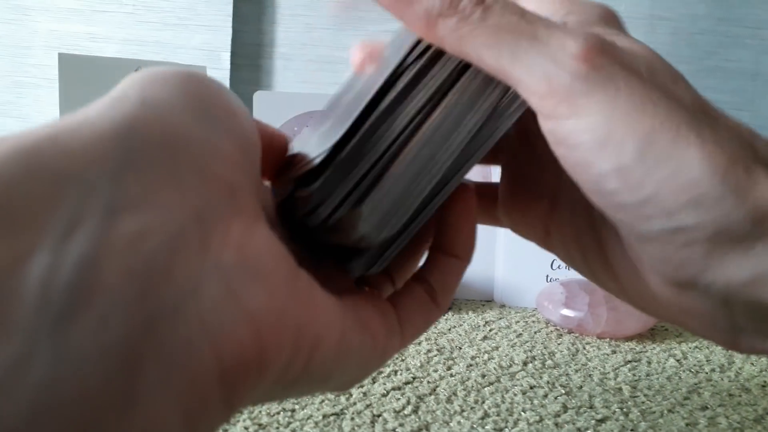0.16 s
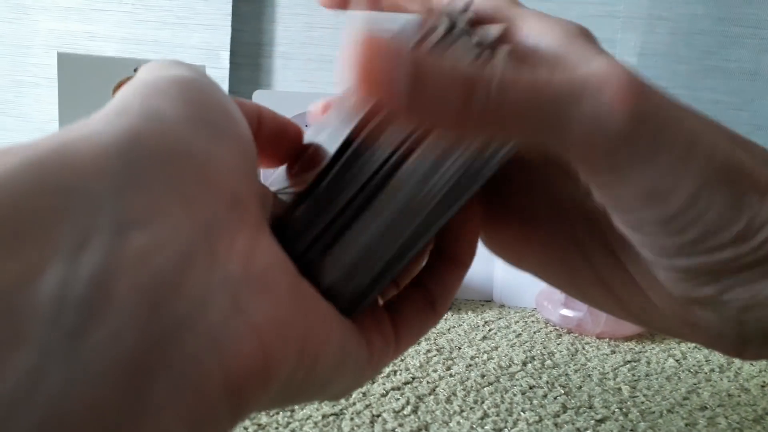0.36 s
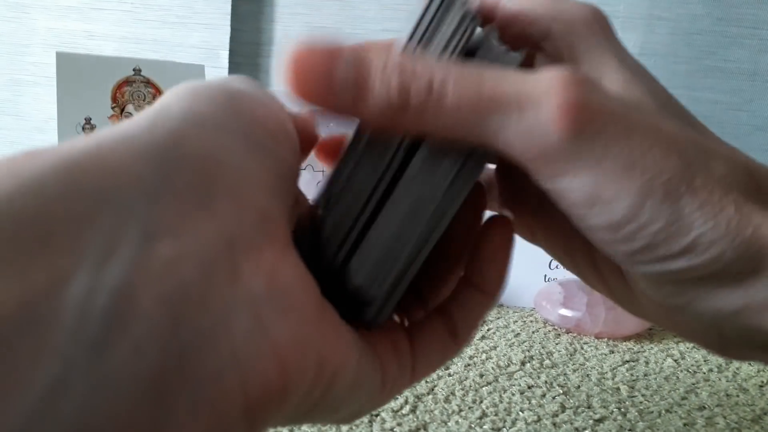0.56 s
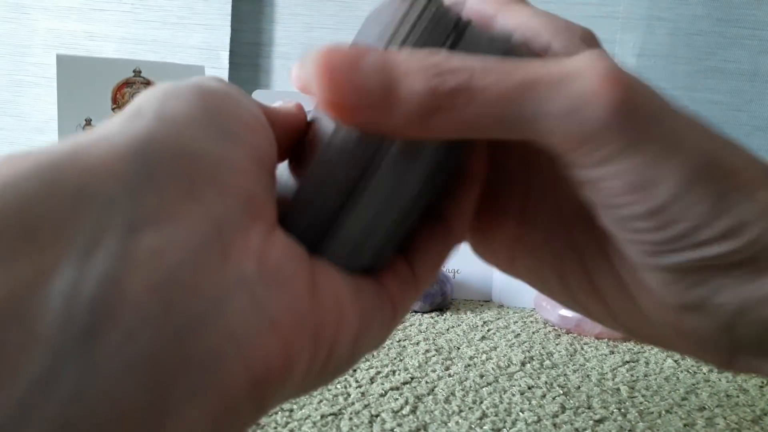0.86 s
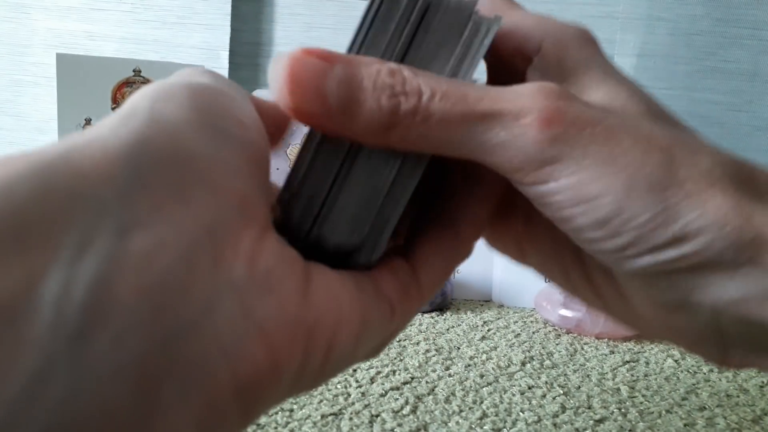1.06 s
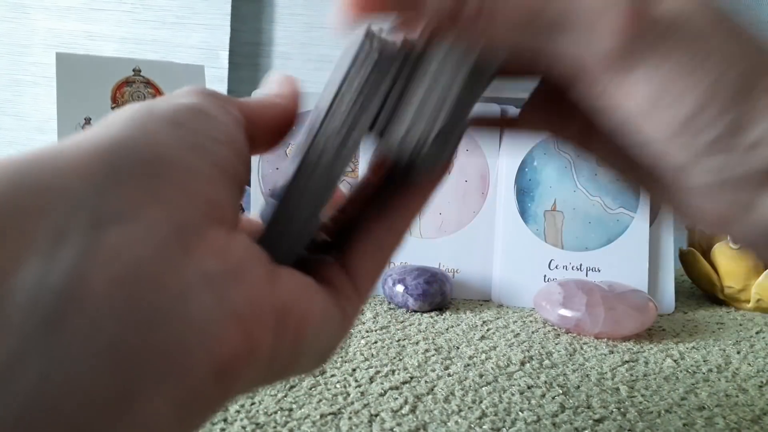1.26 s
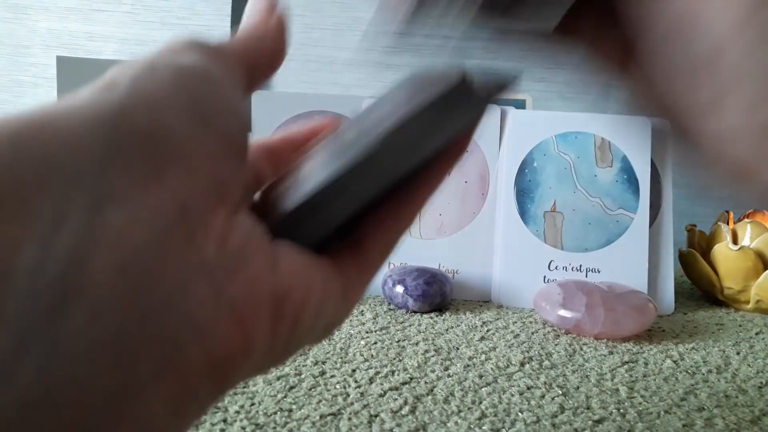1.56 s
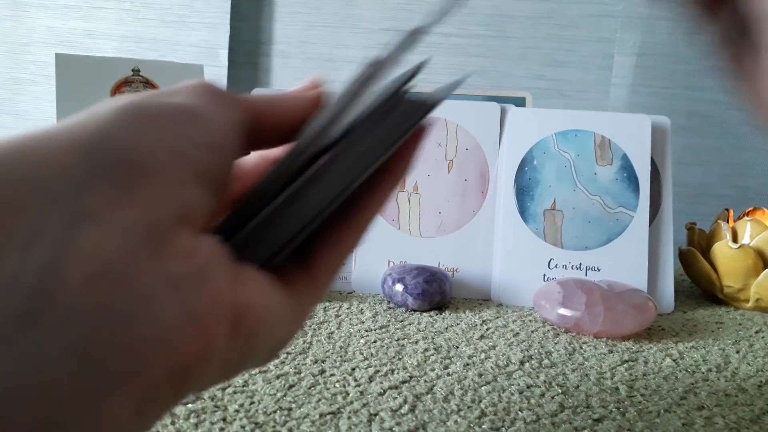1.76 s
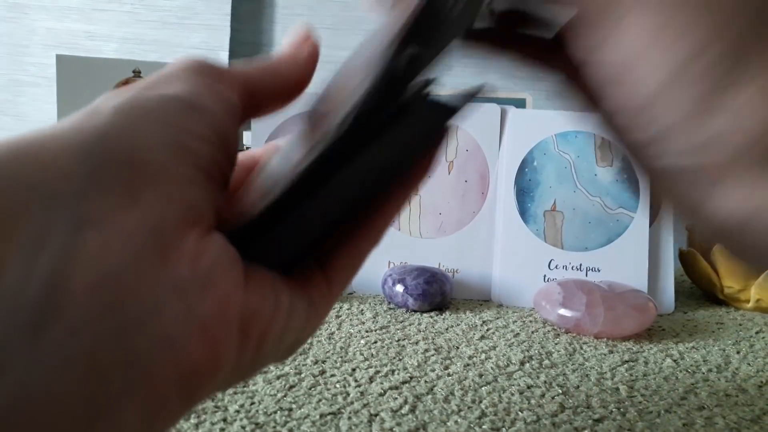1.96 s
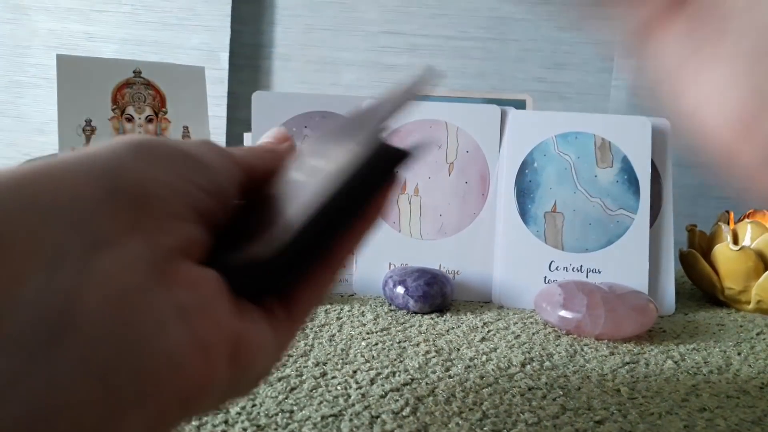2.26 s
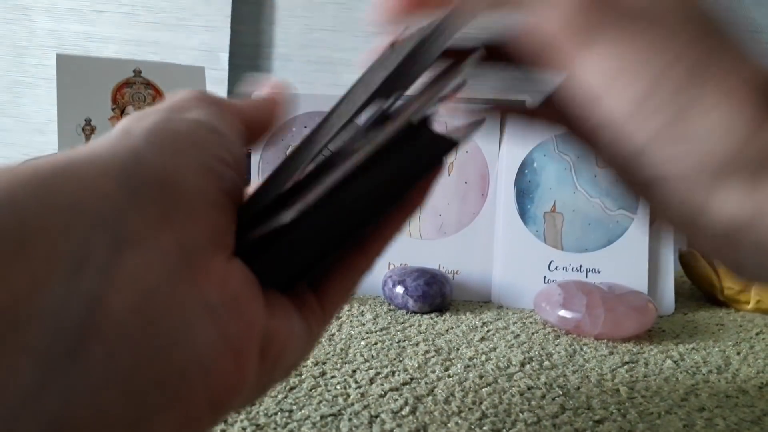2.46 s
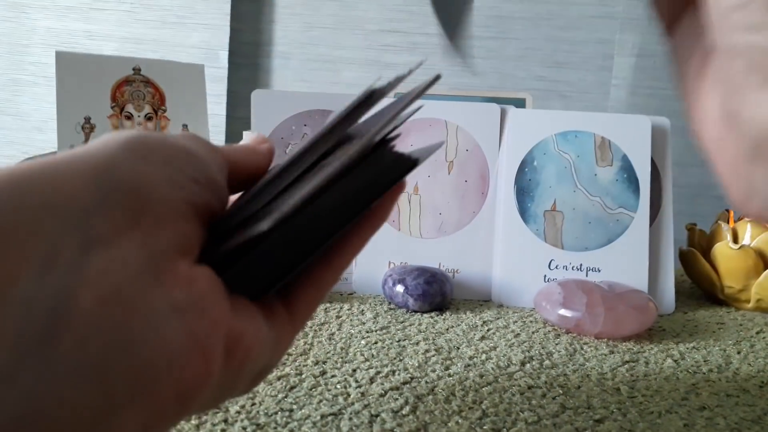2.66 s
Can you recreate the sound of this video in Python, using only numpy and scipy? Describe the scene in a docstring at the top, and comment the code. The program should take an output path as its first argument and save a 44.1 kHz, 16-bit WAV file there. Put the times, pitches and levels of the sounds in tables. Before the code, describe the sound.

Card shuffling by hand in a small room, with quick slides, sharp flicks and light knocks

```python
"""In a small room, a deck of cards is shuffled overhand, close to the microphone.
Cards rub across each other (noise with tiny catches), edges snap (very short noise bursts), and
dropped packets knock on the deck in the cupped palm (low bursts). Shifting grips rumble softly.
A short room tail follows the cards; a low hum and a faint hiss lie underneath."""
import sys
import numpy as np
from scipy import signal
from scipy.fft import rfft, irfft, next_fast_len
from scipy.io import wavfile
from scipy.ndimage import map_coordinates

SR = 44100
rng = np.random.default_rng(int(sys.argv[2]) if len(sys.argv) > 2 else 0)


def master_out(mix):
    """Clip the mix to full scale and print it as 16-bit PCM to the path in sys.argv[1]."""
    frames = np.transpose(np.atleast_2d(mix))
    ceiling = np.clip(frames, -1, 1)
    pcm = np.round(ceiling * 32767).astype(np.int16)
    wavfile.write(sys.argv[1], SR, pcm)


N = 123479  # length in samples

# Colour of the faint hiss. Each row: frequency in Hz, relative level in dB.
HISS_COLOUR = [(200, -10.5), (500, -8), (1500, -10.5), (5000, -11.5), (8500, -15), (10400, -13),
               (13000, -11), (16000, -37)]
HISS_DB = -77.5


def amp(db):
    """Turn decibels into a plain factor."""
    return 10 ** (np.asarray(db) / 20)


def unit(x):
    """Scale a sound to an rms of 1."""
    return x / np.sqrt(np.mean(x ** 2) + 1e-20)


def along(points, hz):
    """Read a curve of (Hz, value) points, with straight lines on a log frequency axis."""
    point_hz, values = np.transpose(points)
    return np.interp(np.log(hz + 1), np.log(point_hz + 1), values)


def wobble(x):
    """A smooth random curve with one knot per unit of x."""
    return map_coordinates(rng.standard_normal(2048), [x], mode="mirror")


def add(track, start_s, sound):
    """Mix a sound into the track at a time in seconds."""
    part = track[max(round(start_s * SR), 0):][:len(sound)]
    part += sound[:len(part)]


def coloured(x, gain_db, size=2048):
    """Filter x with a response of unit energy that starts at once and never rings ahead."""
    gain = np.maximum(amp(gain_db(np.fft.rfftfreq(size, 1 / SR))), 1e-6)
    # Folding the cepstrum (the transform of the log gain) gives a minimum-phase filter.
    cepstrum = irfft(np.log(gain))
    cepstrum[1:size // 2] *= 2
    cepstrum[size // 2 + 1:] = 0
    response = irfft(np.exp(rfft(cepstrum)))
    return signal.fftconvolve(x, response / np.linalg.norm(response))


def steady(points):
    """Continuous noise of rms 1, its spectrum shaped by (Hz, dB) points."""
    size = next_fast_len(N + SR // 2)
    gain = amp(along(points, np.fft.rfftfreq(size, 1 / SR)))
    noise = irfft(rfft(rng.standard_normal(size)) * gain, size)
    return unit(noise[:N])


def match_energy(x, envelope):
    """Give x the energy of its envelope."""
    return x * np.linalg.norm(envelope) / np.linalg.norm(x)


def burst(envelope, body):
    """A puff of noise sent through a body, with the energy of its envelope."""
    return match_energy(body(envelope * rng.standard_normal(len(envelope))), envelope)


def card(x, edge_hz, tilt_db, leak_db):
    """Cards radiate little under a low edge; each sound gets its own random resonances."""
    # Colour shared by all card sounds. Each row: frequency in Hz, relative gain in dB.
    card_colour = [(300, -8.5), (1000, -1), (2200, -2.5), (3000, 0), (4700, 0), (5600, -0.5), (7400, -2.5),
                   (8400, -5.5), (9500, -2), (10300, 8.5), (11300, 3.5), (13000, 0.5), (15500, -9),
                   (17000, -5.5)]
    edge_slope_db = 30.5  # fall per octave under the low edge, until it stops at leak_db
    ripple_db, ripple_hz = 2.53, 428.2  # depth and spacing of the resonances

    def gain_db(hz):
        octaves_below = np.log2(edge_hz / (hz + 10))
        low_cut = -10 * np.log10(1 + amp(2 * edge_slope_db * octaves_below))
        tilt = tilt_db * np.log2(np.maximum(hz / edge_hz, 1))
        ripple = ripple_db * wobble(hz / ripple_hz)
        return along(card_colour, hz) + np.maximum(low_cut, leak_db) + tilt + ripple
    return coloured(x, gain_db)


def slides():
    """Friction: smooth rubbing and tiny catches under a stroke that rises, holds and falls."""
    # Cards sliding. Each row: start in seconds, rise in seconds, hold in seconds,
    # time to fall by 20 dB in seconds, level in dB, low edge in Hz, tilt in dB per octave.
    strokes = [(0, 0.039, 0.12, 0.03, -61.5, 3800, 2), (0.182, 0.0096, 0.0044, 0.036, -57.5, 4700, -0.5),
               (0.213, 0.029, 0.028, 0.24, -62, 5100, -8.5), (0.35, 0.044, 0.0086, 0.074, -51, 3360, 2),
               (0.438, 0.028, 0.049, 0.086, -58, 2900, 1.5), (0.557, 0.021, 0.006, .04, -60.5, 3130, 3.5),
               (0.619, 0.011, 0.0026, 0.027, -57.5, 3930, 5), (0.643, 0.079, 0.028, 0.022, -68.5, 4160, -1),
               (0.793, 0.013, 0.05, 0.037, -64.5, 3720, -2.5),
               (0.738, 0.0046, 0.0031, 0.0053, -39, 3400, 0),
               (.748, 0.0049, 0.016, 0.049, -60.5, 2300, -6.5),
               (0.877, 0.0025, 0.0012, 0.0026, -35.5, 4540, -7.5),
               (0.882, 0.031, 0.033, 0.021, -55.5, 3670, -9), (1.024, 0.0023, 0.0042, 0.03, -54.5, 3150, 4),
               (1.05, 0.007, 0.065, 0.11, -67.5, 3000, 1.5), (1.14, 0.035, .015, 0.027, -60.5, 4000, 8),
               (1.19, 0.0034, 0.011, 0.023, -51, 3960, 9.5), (1.2, 0.028, 0.072, 0.047, -54.5, 3900, 2.5),
               (1.28, .05, 0.021, 0.066, -53, 2960, -9), (1.332, 0.01, 0.0052, .005, -36, 2930, -8),
               (1.333, 0.0097, 0.0051, 0.0044, -33.5, 4940, 3.5),
               (1.461, 0.053, 0.013, 0.046, -61.5, 3600, -5), (1.596, 0.0035, 0.0047, 0.021, -31, 3470, 4),
               (1.597, 0.011, 0.017, 0.015, -35.5, 2020, 2.5),
               (1.658, 0.00098, 0.0028, 0.0045, -38, 3000, -1),
               (1.674, 0.0036, 0.0085, 0.0059, -37, 2580, 2), (1.616, 0.06, 0.058, 0.025, -48.5, 2190, -2),
               (1.723, 0.025, 0.066, 0.019, -45.5, 4150, 5), (1.782, 0.007, .003, 0.0089, -40.5, 4470, 2),
               (1.803, 0.007, 0.056, 0.066, -58.5, 2780, 0.5), (1.87, 0.0047, 0.0017, 0.017, -36, 2470, 4),
               (1.982, 0.0011, 0.013, 0.012, -37.5, 2560, -4.5),
               (1.989, 0.004, 0.012, 0.08, -51.5, 1570, -9.5), (2.038, 0.014, 0.012, .012, -45, 2980, -2.5),
               (2.176, 0.01, .012, 0.022, -67.5, 3030, 3.5),
               (2.361, 0.013, 0.0065, 0.0065, -38, 3040, -2.5),
               (2.365, 0.0025, 0.053, 0.058, -47.5, 2740, -5.5),
               (2.403, 0.00097, 0.0031, 0.0064, -39, 3200, 11),
               (2.41, 0.0075, .003, 0.0054, -43.5, 3670, -15.5), (2.441, 0.02, 0.052, 0.07, -54, 2620, -3),
               (2.563, 0.056, 0.0061, 0.01, -45.5, 2980, 4.5),
               (2.618, 0.011, 0.035, 0.048, -66, 2630, -6.5),
               (2.74, 0.0016, 0.0071, 0.039, -52.5, 1530, -5.5),
               (2.747, 0.0024, 0.0028, 0.01, -48, 3520, -6), (2.765, 0.0042, 0.0092, .05, -31, 2060, -1.5)]
    catch_rate, catch_size_db = 2900, 4  # fibres catching: average per second, scatter in size
    catch_share = 0.33  # part of the power that comes from catches
    judder_db, judder_rate = 1.54, 177  # uneven strength: depth, random knots per second
    leak_db = -37  # where the fall under the low edge stops

    out, t = np.zeros(N), np.arange(SR // 2) / SR
    for start, rise, hold, fall, db, edge_hz, tilt_db in strokes:
        attack = np.minimum(t / rise, 1) ** 1.28
        stroke = attack * amp(-20 * np.maximum(t - rise - hold, 0) / fall)
        sizes = amp(catch_size_db * np.minimum(rng.exponential(size=len(t)), 4))
        caught = rng.random(len(t)) < catch_rate / SR
        catches = unit(caught * sizes * rng.choice([-1, 1], len(t)))
        smooth = rng.standard_normal(len(t))
        rub = np.sqrt(catch_share) * catches + np.sqrt(1 - catch_share) * smooth
        judder = amp(judder_db * wobble(t * judder_rate))
        x = card(stroke * rub * judder, edge_hz, tilt_db, leak_db)
        add(out, start, amp(db) * match_energy(x, stroke))
    return out


def snaps():
    """An edge slips free and slaps the next card: a noise burst that dies at once."""
    # Edges snapping. Each row: start in seconds, level in dB, time to fall by 60 dB in seconds,
    # low edge in Hz, tilt in dB per octave.
    slaps = [(.668, -58, 0.027, 4000, 4), (0.872, -44, 0.011, 3580, -5), (.9205, -46.5, 0.016, 3450, -4),
             (1.5885, -36, 0.016, 1940, -5.5), (1.723, -36, .01, 2460, -2), (1.9686, -30.5, .012, 2500, -7),
             (1.974, -27.5, 0.022, 2480, -7.5), (1.993, -28.5, 0.0048, 2140, -12),
             (2.024, -43, .008, 1990, -4), (2.102, -50.5, 0.02, 2100, -1), (2.1222, -45, 0.013, 1200, -6),
             (2.365, -34, 0.01, 2810, -1.5), (2.387, -32, .006, 3000, -5), (2.5092, -39, 0.0068, 2808, -13),
             (2.526, -41, .01, 2600, 1), (2.7323, -33, 0.013, 1210, -3.5), (2.766, -32, 0.01, 1230, -7),
             (2.7696, -15, 0.0091, 2360, -3.5), (2.773, -5, 0.003, 2530, -1.5)]
    leak_db = -24.5  # where the fall under the low edge stops
    out, t = np.zeros(N), np.arange(SR // 10) / SR
    for start, db, t60, edge_hz, tilt_db in slaps:
        sound = burst(amp(-60 * t / t60), lambda x: card(x, edge_hz, tilt_db, leak_db))
        add(out, start, amp(db) * sound)
    return out


def knocks():
    """A packet thuds on the palm and sounds the hollow of the hand: two low noise bursts."""
    # Packets landing in the hand. Each row: start in seconds, palm thud in dB, hollow knock in dB.
    landings = [(0.74, -71.5, -50.5), (0.878, -54.5, -54.5), (.91, -65, -68), (1.024, -65, -73),
                (1.589, -71, -62.5), (1.972, -58, -54), (1.986, -52.5, -46.5), (2.022, -55, -62.5),
                (2.1213, -60.5, -57.5), (2.365, -65.5, -43.5), (2.403, -82, -51), (2.5085, -82, -63),
                (2.7302, -50, -44.5), (2.77, -40.5, -34.5)]
    # Colours of the palm and of the hollow hand. Each row: frequency in Hz, relative gain in dB.
    thud_colour = [(60, -12), (130, -5.5), (250, 3.5), (340, 1), (450, -13), (600, -34), (1500, -45)]
    hollow_colour = [(200, -27.5), (480, -20), (680, -13.5), (860, -5), (1100, -3.5), (1350, -13.5),
                     (3000, -30.5)]
    thud_t60, hollow_t60 = 0.063, 0.041  # seconds to fall by 60 dB
    rise_s = 0.0012  # time constant of the onset

    out, t = np.zeros(N), np.arange(SR // 2) / SR
    for start, thud_db, hollow_db in landings:
        thud = thud_db, thud_t60, thud_colour
        hollow = hollow_db, hollow_t60, hollow_colour
        for db, t60, points in (thud, hollow):
            envelope = (1 - np.exp(-t / rise_s)) * amp(-60 * t / t60)
            sound = burst(envelope, lambda x: coloured(x, lambda hz: along(points, hz)))
            add(out, start, amp(db) * sound)
    return out


def grips():
    """Skin and cards creep against each other: a soft rumble that swells and fades."""
    # The hands shifting their grip. Each row: middle in seconds,
    # half length in seconds (from the peak to 1/e), level in dB.
    shifts = [(0.158, 0.055, -73), (0.444, 0.076, -79), (1.033, 0.021, -66), (1.368, 0.026, -72.5),
              (1.672, 0.0064, -65), (1.78, 0.037, -70), (2.515, .015, -61), (2.685, 0.047, -70)]
    # Colour of the rumble. Each row: frequency in Hz, relative level in dB.
    flesh_colour = [(50, -7), (90, -13.5), (130, 4.5), (220, -9.5), (320, -13.5), (600, -31), (1500, -74)]
    t = np.arange(N) / SR
    swells = sum(amp(db) * np.exp(-((t - middle) / half) ** 2) for middle, half, db in shifts)
    return steady(flesh_colour) * swells


def room(x):
    """A short tail of fading noise; each frequency dies at its own speed."""
    # How long the room rings. Each row: frequency in Hz, time to fall by 60 dB in seconds.
    ring_times = [(150, 0.3), (1000, 0.42), (3500, 0.24), (8000, 0.2), (15000, 0.14)]
    wall_delay_s = 0.004
    hz, t, bands = signal.stft(rng.standard_normal(SR // 2), SR, nperseg=256)
    fade = amp(-60 * t / along(ring_times, hz)[:, None])
    tail = signal.istft(bands * fade, SR, nperseg=256)[1]
    out = np.zeros(N)
    add(out, wall_delay_s, signal.fftconvolve(x, tail / np.linalg.norm(tail)))
    return out


def background():
    """A low tone of wavering pitch with rumble around it, and faint hiss."""
    # Colour of the rumble. Each row: frequency in Hz, relative level in dB.
    rumble_colour = [(25, -36.5), (45, -36.5), (70, -14), (82, -13), (91, 2), (100, -13.5), (115, -12),
                     (170, -19.5), (300, -32.5), (600, -50.5)]
    # Level of the hum over time. Each row: time in seconds, level in dB.
    hum_level = [(0, -76), (.05, -58.5), (.45, -62), (.6, -65), (.85, -65.5), (1.05, -67), (1.2, -69),
                 (1.55, -67.5), (1.68, -61), (1.85, -64.5), (2.05, -63), (2.35, -65), (2.55, -64.5),
                 (2.63, -61), (2.8, -66)]
    tone_hz, drift_rad = 93.4, 0.4  # pitch, and how far the phase wanders
    tone_db, rumble_db = -3, -3  # against the level of the hum
    t = np.arange(N) / SR
    tone = unit(np.sin(2 * np.pi * tone_hz * t + drift_rad * wobble(10 * t)))
    level = amp(np.interp(t, *np.transpose(hum_level)))
    hum = level * (amp(tone_db) * tone + amp(rumble_db) * steady(rumble_colour))
    return hum + amp(HISS_DB) * steady(HISS_COLOUR)


def scene():
    """The cards and the room, almost alike in both channels."""
    room_db = -11.5
    width_db, hiss_width_db = -61.5, -6.5  # what differs between channels: room tail, hiss
    cards = slides() + snaps() + knocks() + grips()
    mid = cards + amp(room_db) * room(cards) + background()
    side = amp(width_db) * room(cards) + amp(HISS_DB + hiss_width_db) * steady(HISS_COLOUR)
    return np.array([mid + side, mid - side])


def record(dry):
    """The recorder cuts steeply above its band limit."""
    top_hz, order = 15950, 90
    size = next_fast_len(N + SR // 2)
    hz = np.fft.rfftfreq(size, 1 / SR)
    loss = np.sqrt(1 + (hz / top_hz) ** (2 * order))
    return irfft(rfft(dry, size) / loss, size)[:, :N]


dry = scene()
out = record(dry)
master_out(out)
```